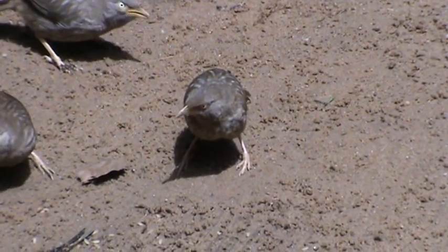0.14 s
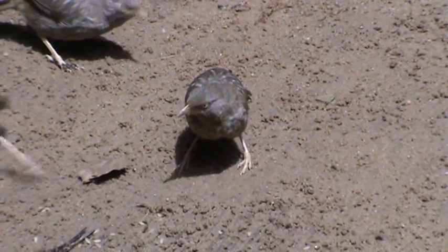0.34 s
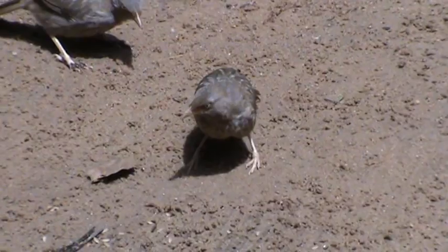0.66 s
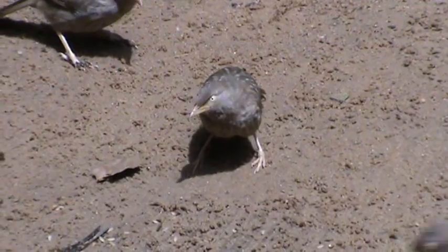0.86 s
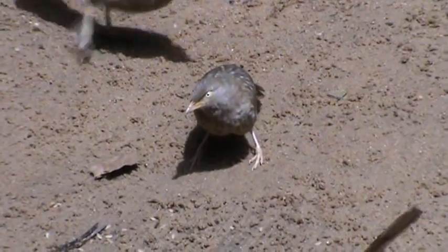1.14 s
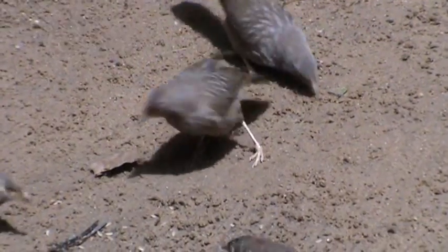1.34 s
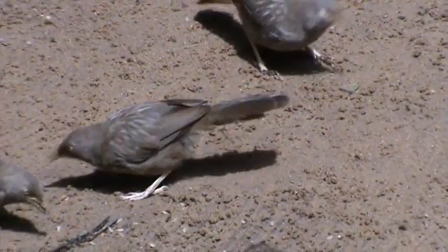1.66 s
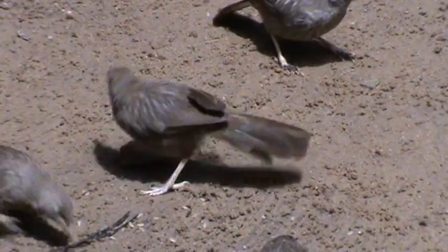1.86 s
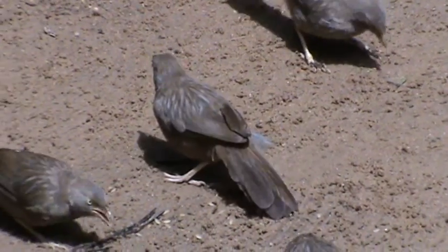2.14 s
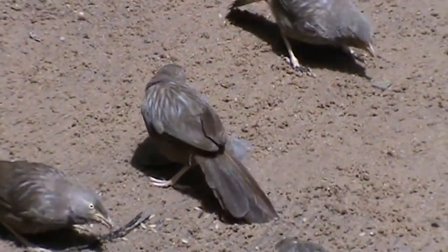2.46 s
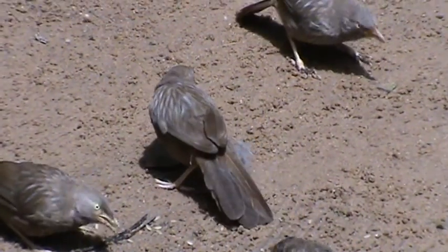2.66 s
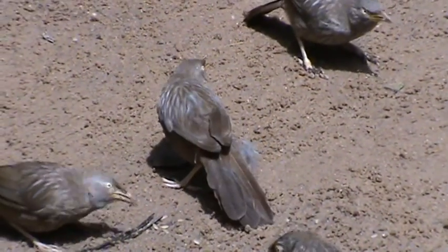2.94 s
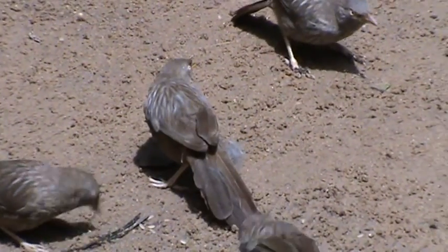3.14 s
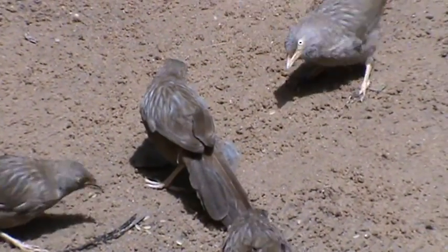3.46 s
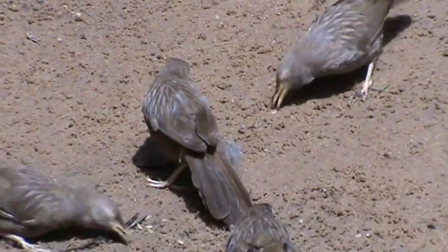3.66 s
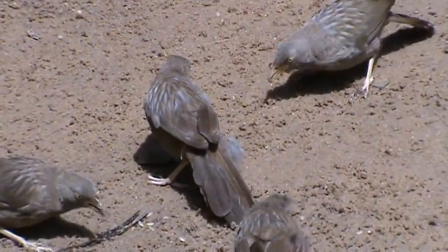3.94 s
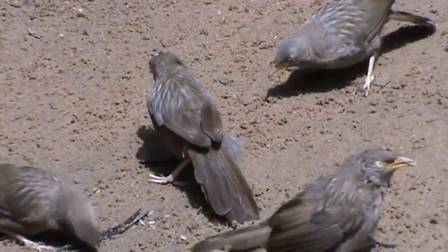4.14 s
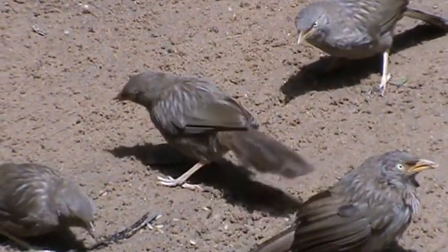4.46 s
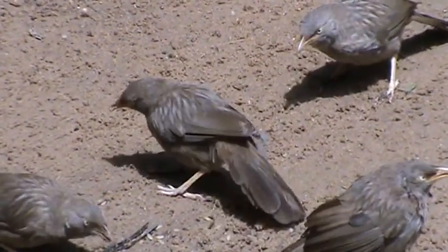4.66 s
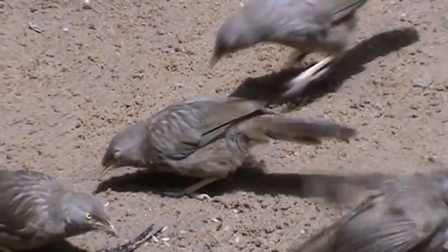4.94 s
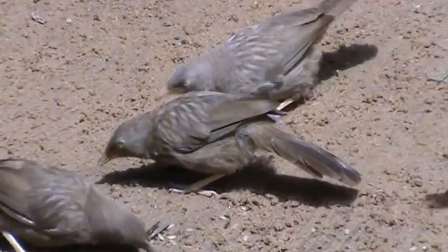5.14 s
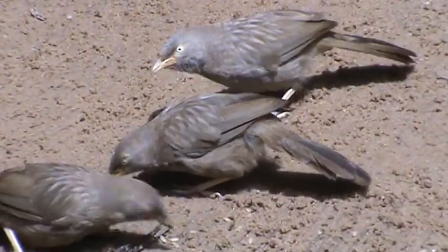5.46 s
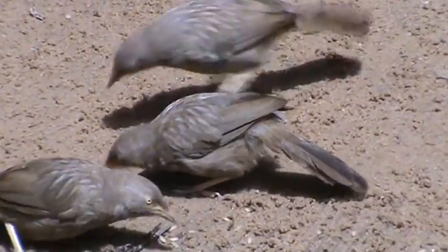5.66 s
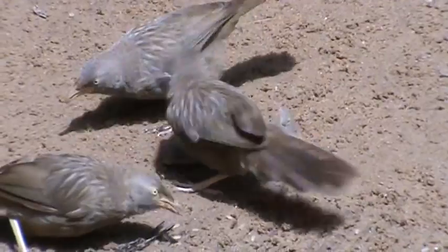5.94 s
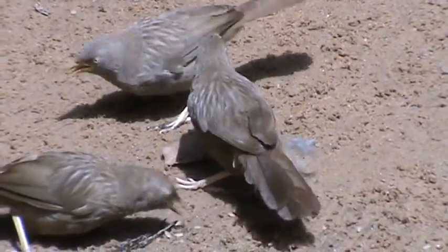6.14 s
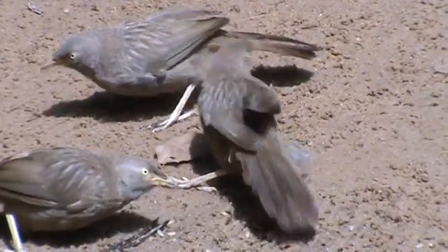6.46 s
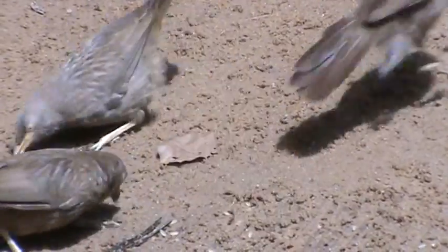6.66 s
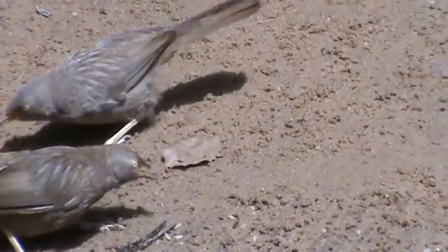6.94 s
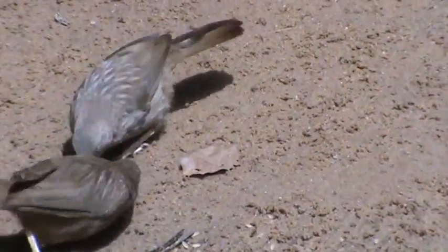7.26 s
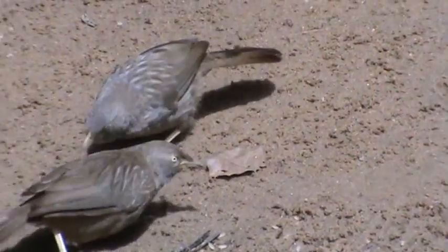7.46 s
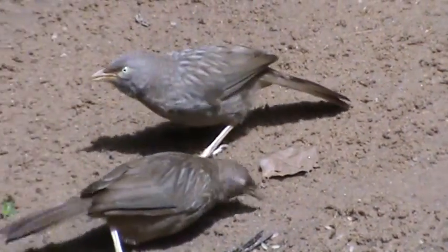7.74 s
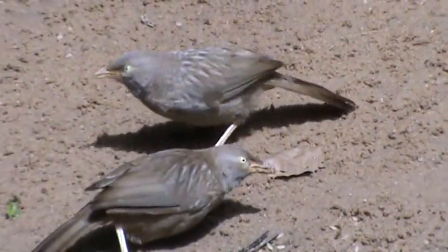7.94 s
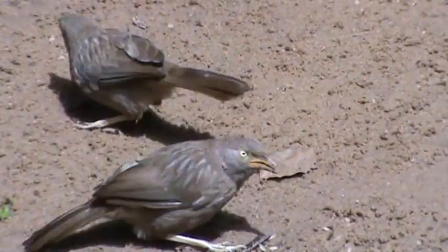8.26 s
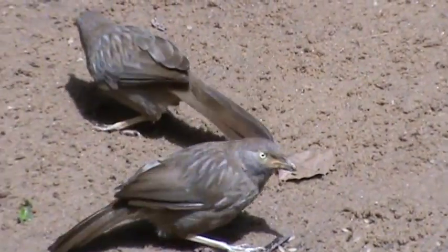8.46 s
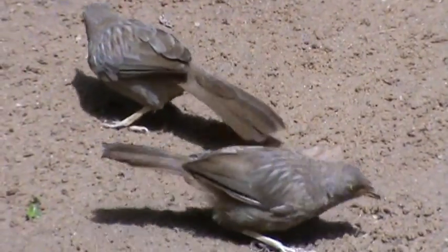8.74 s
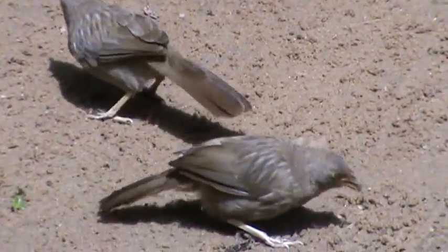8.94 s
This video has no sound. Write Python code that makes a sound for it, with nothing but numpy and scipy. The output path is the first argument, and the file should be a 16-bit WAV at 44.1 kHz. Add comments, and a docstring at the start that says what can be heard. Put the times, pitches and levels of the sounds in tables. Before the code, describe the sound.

Outdoors, a flock of babblers squabbles close to the microphone, with light echoes around them. From 0 to 1.3 seconds calls come thick and fast: rasps, a nasal caw, falling yelps, harsh brays, thin squeaks and clear arching cries. After a short gap, a grunt, peck, caw and more yelps and cries cluster at 1.8-2.7. From 2.9 to 4.6 it is sparser, with faint rising calls, soft wing flutters and gruff grunts slightly left. A sharp yelp at 4.7 starts another quarrel of brays and cries to 5.4; a long trilling squeal at 5.5-5.8 plunges into a rasp. Grunts and a caw follow at 6.2-6.7. From 7.5 a distant songbird on the left repeats a rising whistle and steep downslur four times, amid faint hoarse calls and a peck. A final rasp and weak bray come at 9. A low hum, soft air and a fading far engine run underneath.

```python
"""On open ground a flock of babblers squabbles, with voices mostly around 2 kHz.
Clear cries arch over; split voices add undertones for yelps, brays, caws and grunts; noise makes rasps.
Bursts of noise make fluttering wings and pecking beaks; gliding pure tones make a songbird further off.
Trees and walls echo the birds over a steady low hum, a distant engine and soft outdoor noise."""
import sys
import numpy as np
from scipy import signal
from scipy.fft import rfft, irfft, next_fast_len
from scipy.io import wavfile

SR = 44100
rng = np.random.default_rng(int(sys.argv[2]) if len(sys.argv) > 2 else 0)


def materialize(psi):
    """Save the field psi as 16-bit PCM at rate SR to the path in sys.argv[1].

    A 1-D psi becomes a single channel; in a 2-D psi each row is a channel.
    """
    bounded = np.clip(np.atleast_2d(psi).T, -1, 1)
    quanta = np.round(bounded * 32767).astype(np.int16)
    wavfile.write(sys.argv[1], SR, quanta)


N = 401751
TIME = np.arange(N) / SR
TOP_HZ = 15800  # upper limit of the sound


def undb(db):
    """Turn decibels into gain."""
    return 10 ** (np.asarray(db) / 20)


def unit(x):
    """Scale to an rms level of 1."""
    return x / np.sqrt(np.mean(x ** 2) + 1e-20)


def log_curve(hz, points):
    """Read (Hz, dB) points on a log-frequency axis."""
    point_hz, db = np.transpose(points)
    return np.interp(np.log(hz + 1), np.log(point_hz), db)


def colour(x, db_of):
    """Filter by a gain in dB that depends on frequency."""
    length = x.shape[-1]
    size = next_fast_len(length)
    gain = undb(db_of(np.fft.rfftfreq(size, 1 / SR)))
    return irfft(rfft(x, size) * gain, size)[..., :length]


def wander(size, rate_hz):
    """Smooth random motion around 0 with a spread of about 1, mostly slower than rate_hz."""
    noise = rng.standard_normal(size + SR // 8)
    smooth = colour(noise, lambda f: -20 * np.log10(1 + (f / rate_hz) ** 2))
    return unit(smooth)[:size]


def band_noise(size, hz, slope_db):
    """Noise around a centre; an octave away it is slope_db weaker, two octaves away four times that."""
    noise = rng.standard_normal(size)
    return unit(colour(noise, lambda f: -slope_db * np.log2((f + 1) / hz) ** 2))


def add(out, start, x, pan_db=0):
    """Mix a sound in at its time in seconds; pan_db is how much louder it is on the left."""
    i = max(int(start * SR), 0)
    x = x[:max(N - i, 0)]
    sides = undb(np.array([[pan_db], [-pan_db]]) / 2)
    out[:, i:i + len(x)] += sides * x


def syllable(length, tones_hz, cycles, under_db, rough):
    """The syrinx repeats its pattern every few tone cycles, which puts undertones between the harmonics."""
    size = int(length * SR)
    t = np.arange(size) / SR
    effort = np.sqrt(rough)

    # the pitch follows a smooth curve through its start, middle and end
    hz = np.polyval(np.polyfit([0, .5, 1], tones_hz, 2), t / length)

    # a pattern of more than two cycles also warbles slowly
    warble = .018 * (cycles > 2) * np.sin(2 * np.pi * (22 * t + rng.random()))

    # a strained voice trills, jitters and lurches in pitch; these shares hold at full roughness
    trill = .035 * np.sin(2 * np.pi * 170 * t + wander(size, 50))
    jitter = .045 * wander(size, 402)
    lurch = .022 * wander(size, 73)
    pitch = hz * (1 + warble + rough * (trill + jitter + lurch))
    phase = 2 * np.pi * np.cumsum(pitch) / SR

    voice = np.zeros(size)
    for k in range(1, int(TOP_HZ * cycles / max(tones_hz)) + 1):
        harmonic = k / cycles
        # from the second harmonic to the sixth, each is 5 dB weaker
        db = -5 * np.clip(harmonic - 2, 0, 4)
        if k % cycles:  # an undertone, each of uneven strength
            db = db + under_db + 2 * rng.standard_normal()
        # each partial beats on its own, the higher ones more, and slowly fades in and out
        beating = 1 + .85 * effort * min(harmonic / 2, 2) * wander(size, 840)
        fading_db = 3.6 * effort * wander(size, 35)
        partial = np.sin(harmonic * phase + 2 * np.pi * rng.random())
        voice += undb(db + fading_db) * beating * partial

    # harsh syllables leak air once a pattern
    leak = unit(rng.standard_normal(size) * (1 + np.cos(phase / cycles)))
    shimmer = np.exp(.38 * effort * wander(size, 1100))
    return (unit(voice) + 1.1 * rough * effort * leak) * shimmer


# How the babbler's throat colours its voice. Each row: frequency in Hz, gain in dB.
THROAT = [(300, -28), (650, 2.5), (950, 1.5), (1300, 3), (1700, 7.5), (2350, 6), (2800, 1.5), (4600, 1),
          (5400, 0), (6800, 0), (8500, -6), (15000, -15.5)]


def squawk(length, tones_hz, cycles, db, upper_hz, upper_db, treble_db, under_db, rough,
           fray=0, swell_db=0, low_db=0, width_hz=600, ring_db=0):
    """One syllable; the throat colours it, the opening beak tunes an upper resonance and lets out treble."""
    along = np.linspace(0, 1, int(length * SR))
    # the voice may fray towards the end
    roughness = np.clip(rough + fray * along ** 2, 0, 1)
    source = syllable(length, tones_hz, cycles, under_db, roughness)

    edge_hz = max(upper_hz + 250, 3900)  # the treble change starts here
    beak = [(650, 2 * low_db), (1300, low_db), (2400, 0), (edge_hz, 0), (edge_hz + 700, treble_db)]

    def mouth_db(f):
        upper = upper_db * np.exp(-((f - upper_hz) / width_hz) ** 2)
        # a tight throat rings at one pitch
        ring = ring_db * np.exp(-((f - 2350) / 300) ** 2)
        return log_curve(f, THROAT) + log_curve(f, beak) + upper + ring

    voice = unit(colour(source, mouth_db))
    attack_s, release_s = .02, .036
    gate = np.clip(length * np.minimum(along / attack_s, (1 - along) / release_s), 0, 1)
    # swell_db is the gain in level from start to end
    return voice * gate * undb(db + swell_db * (along - .5))


# Toneless rasps, some of them the hiss of nearby calls, some fainter. Each row: start in seconds,
# length in seconds, level in dB, treble in dB.
RASPS = [(-.02, 0.046, -40.5, -7), (0.301, 0.082, -43.5, -0.5), (0.62, 0.077, -43.5, -1),
         (0.675, 0.13, -39, 1.5), (5.853, 0.11, -37.5, 2), (5.938, 0.15, -43, 0),
         (6.866, 0.21, -48.5, -0.5), (7.257, 0.25, -48, -3), (9.003, 0.1, -40.5, -1)]
# The throat that colours the rasps. Each row: frequency in Hz, gain in dB.
RASP_THROAT = [(400, -19.5), (900, -6.5), (1600, -4), (2200, 2.5), (2900, -5), (4000, -3), (7000, -10.5),
               (15000, -36.5)]


def rasps():
    """Squawks so harsh that only a grainy hiss in the throat is left."""
    out = np.zeros((2, N))
    for start, length, db, treble_db in RASPS:
        size = int(length * SR)
        source = rng.standard_normal(size) * np.exp(.051 * wander(size, 400))
        treble = [(3000, 0), (5500, treble_db)]
        voice = colour(source, lambda f: log_curve(f, RASP_THROAT) + log_curve(f, treble))
        swell = np.sqrt(np.sin(np.pi * np.arange(size) / size))
        add(out, start, undb(db) * unit(voice * swell))
    return out


# The tone balance of the outdoor background. Each row: frequency in Hz, gain in dB.
AIR_COLOUR = [(25, -7.5), (70, -2.5), (140, -9.0), (260, -10.5), (380, -14.5), (900, -15.5), (1400, -19),
              (2200, -17.5), (3500, -24.5), (8000, -28), (15500, -33)]
# The loudness it sways around. Each row: time in seconds, level in dB.
AIR_LEVEL = [(0, -48.5), (9.1, -51)]


def air():
    """Outdoor background noise: bass and faint hiss in the centre, the middle spread wide."""
    mid, side = colour(rng.standard_normal((2, N)), lambda f: log_curve(f, AIR_COLOUR))
    # how far each frequency spreads sideways (Hz, dB)
    spread = [(60, -36), (250, -13.5), (600, -5.5), (6000, -1), (12000, -16.0)]
    side = colour(side, lambda f: log_curve(f, spread))
    both = np.array([mid + side, mid - side])
    sway_db = .7 * wander(N, 0.11)
    return unit(both) * undb(np.interp(TIME, *np.transpose(AIR_LEVEL)) + sway_db)


# Steady low tones. Each row: frequency in Hz, level in dB.
HUM = [(48.4, -51), (199.2, -68.5)]


def hum():
    """Steady pure tones."""
    return sum(undb(db) * np.sqrt(2) * np.sin(2 * np.pi * hz * TIME) for hz, db in HUM)


# How the distant engine runs. Each row: time in seconds, firing rate in Hz, level in dB.
ENGINE = [(0, 72.14, -49), (1.5, 64.23, -53.5), (4, 71.6, -57.5), (5.2, 63.85, -57.5), (9.1, 67.32, -67)]
# Strength of one, two and three times the firing rate, in dB against each other.
ENGINE_ORDERS_DB = [-2, -6, -2.5]


def engine():
    """A far engine sounds at multiples of its firing rate, changes speed and fades."""
    s, hz, db = np.transpose(ENGINE)
    rate = np.interp(TIME, s, hz) * (1 + 0.0121 * wander(N, 8.26))
    phase = 2 * np.pi * np.cumsum(rate) / SR
    drone = np.zeros(N)
    for k, order_db in enumerate(ENGINE_ORDERS_DB, start=1):
        drone += undb(order_db + 1.25 * wander(N, 2.9)) * np.sin(k * phase)
    return unit(drone) * undb(np.interp(TIME, s, db))


# Nasal caws. Each row: start in seconds, length in seconds, pitch in Hz, level in dB,
# upper resonance in Hz, its lift in dB, left minus right in dB.
CAWS = [(0.092, 0.15, 2070, -35.5, 3630, 5.5, -3.5), (1.956, 0.11, 2310, -38.5, 3640, -4.5, 2.5),
        (6.471, .114, 2424, -36.5, 3630, -5, 3.5)]


def caws():
    """The voice drops an octave into a nasal stack that droops."""
    out = np.zeros((2, N))
    for start, length, hz, db, upper_hz, upper_db, pan_db in CAWS:
        tones_hz = (1.07 * hz, hz, .93 * hz)
        voice = squawk(length, tones_hz, 2, db, upper_hz, upper_db, treble_db=-12.5,
                       under_db=1.5, rough=.47, swell_db=5.0, low_db=-7.5)
        add(out, start, voice, pan_db)
    return out


# Falling yelps. Each row: start in seconds, length in seconds, first pitch in Hz, last pitch in Hz,
# tone cycles per pattern, roughness from 0 to 1, level in dB, upper resonance in Hz, its lift in dB,
# treble in dB.
YELPS = [(0.215, 0.094, 2735, 2213, 4, 0.65, -33.5, 3100, 10.5, -0.5),
         (0.391, 0.06, 3480, 2206, 3, 0.48, -33.5, 3240, 9, -10),
         (0.419, 0.062, 3063, 2330, 4, 0.63, -33.5, 3750, 5, -8),
         (2.333, 0.099, 2588, 1890, 3, .32, -36.5, 4470, 13, 3.5),
         (2.407, 0.11, 2720, 1853, 3, 0.5, -37, 4100, 7, 0.5),
         (2.575, 0.097, 2540, 2173, 3, 0.47, -40, 4600, 0, 1),
         (2.642, 0.088, 2696, 2066, 4, 0.69, -40, 4070, 2, -3.5),
         (3.823, 0.14, 3255, 1417, 2, 0.29, -43.5, 4360, 3.5, -6),
         (4.02, 0.12, 2194, 1920, 3, 0.48, -42.5, 3760, -1, -2),
         (4.678, 0.055, 3506, 2680, 2, 0.48, -30.5, 4960, 5, -8),
         (4.728, 0.065, 2905, 2040, 2, .5, -41, 3580, 7, -8),
         (5.132, 0.084, 2480, 1696, 3, 0.28, -36, 3520, 7, -3.5)]


def yelps():
    """A split voice slides down through a ringing throat."""
    out = np.zeros((2, N))
    for start, length, first, last, cycles, rough, db, upper_hz, upper_db, treble_db in YELPS:
        tones_hz = (first, (first + last) / 2, last)
        voice = squawk(length, tones_hz, cycles, db, upper_hz, upper_db, treble_db,
                       under_db=-3, rough=rough, swell_db=4.0, low_db=-3.5, ring_db=4.0)
        add(out, start, voice, pan_db=-1.5)
    return out


# Harsh held brays. Each row: start in seconds, length in seconds, pitch in Hz, tone cycles per pattern,
# roughness from 0 to 1, level in dB, upper resonance in Hz, its lift in dB, treble in dB.
BRAYS = [(0.461, 0.14, 1925, 3, 0.22, -36, 3720, 6.5, -7),
         (0.779, 0.2, 1892, 3, 0.26, -34.5, 3770, 3.5, -10),
         (2.044, 0.11, 2030, 3, 0.23, -41, 4750, -4, 0.5), (4.773, 0.13, 2486, 2, 0.72, -36, 4300, 4, -7),
         (5.193, 0.129, 1955, 3, 0.38, -35, 3400, 4, -2.5), (9.008, .12, 1850, 3, .3, -46, 3860, 19, 2)]


def brays():
    """A split voice settles onto its pitch and holds, with strong undertones and hiss from the open beak."""
    out = np.zeros((2, N))
    for start, length, hz, cycles, rough, db, upper_hz, upper_db, treble_db in BRAYS:
        tones_hz = (1.06 * hz, hz, 1.01 * hz)
        voice = squawk(length, tones_hz, cycles, db, upper_hz, upper_db, treble_db,
                       under_db=0, rough=rough, swell_db=2.0, low_db=-12)
        size = len(voice)
        # a hiss, and a fainter sizzle far above it; both follow the treble setting
        hiss = undb(-4.5) * band_noise(size, 5100, slope_db=93)
        sizzle = undb(-19.5) * band_noise(size, 12200, slope_db=40)
        swell = np.sin(np.linspace(0, np.pi, size))
        add(out, start, voice + undb(db + treble_db) * (hiss + sizzle) * swell, pan_db=-1.0)
    return out


# Clear cries. Each row: start in seconds, length in seconds, top pitch in Hz, share of the length at
# which it is reached, share of pitch lost by the end, level in dB, lift of the upper resonance in dB,
# treble in dB, roughness from 0 to 1 at the start.
CRIES = [(0.575, 0.069, 1930, 0.23, 0.084, -33, 14, 0, 0.6),
         (0.942, 0.12, 2242, 0.31, 0.21, -32, 4, -3, 0.24),
         (1.128, 0.086, 2277, 0.48, 0.078, -30.5, 3, -13, 0),
         (1.201, 0.12, 2150, 0.16, 0.35, -36, 6.5, -3, 0.02),
         (2.117, 0.14, 2043, 0.213, 0.38, -38, 4, 5.5, 0.58),
         (4.875, 0.15, 1992, 0.37, 0.38, -36.5, 13, 2.5, 0.33),
         (5.295, 0.13, 2090, 0.25, 0.39, -35, 10, -2.5, 0.38)]


def cries():
    """A clear tone arches over, its upper resonance near the second harmonic; it frays as the effort fades."""
    out = np.zeros((2, N))
    for start, length, hz, top, fall, db, upper_db, treble_db, rough in CRIES:
        arch = ((np.array([0, .5, 1]) - top) / (1 - top)) ** 2
        tones_hz = hz * (1 - fall * arch)
        voice = squawk(length, tones_hz, 2, db, 1.82 * hz, upper_db, treble_db,
                       under_db=-31, rough=rough, fray=0.44, swell_db=-2.5, width_hz=1250)
        add(out, start, voice, pan_db=-0.5)
    return out


# Thin squeaks over the rasping voice. Each row: start in seconds, length in seconds, pitch in Hz,
# level in dB.
SQUEAKS = [(0.672, 0.079, 4690, -38), (0.674, 0.055, 5230, -35), (2.045, 0.097, 4760, -47.5),
           (6.179, 0.088, 5020, -53)]


def squeaks():
    """A high, almost pure tone, slightly arched, with no undertones."""
    out = np.zeros((2, N))
    for start, length, hz, db in SQUEAKS:
        tones_hz = (.96 * hz, hz, .96 * hz)
        voice = squawk(length, tones_hz, 1, db, upper_hz=hz, upper_db=4, treble_db=-4.0,
                       under_db=0, rough=0.28, swell_db=3)
        add(out, start, voice)
    return out


# Gruff grunts. Each row: start in seconds, length in seconds, pitch in Hz, share of pitch lost,
# tone cycles per pattern, roughness from 0 to 1, level in dB, lift of the upper resonance in dB,
# treble in dB.
GRUNTS = [(1.76, 0.16, 2355, 0.06, 6, 0.63, -43.5, 5.5, -8),
          (3.597, 0.15, 2408, 0.13, 5, 0.66, -43.5, 1.5, -1),
          (4.109, 0.081, 2344, 0.0082, 4, 0.15, -38.5, 10.5, -4),
          (4.286, 0.12, 2284, 0.048, 4, 0.5, -43, 4.5, -8.5),
          (4.487, 0.13, 2223, 0.15, 5, 0.66, -42, 3, -8),
          (6.246, 0.1244, 2310, 0.1236, 5, 0.62, -41, 3.5, -10.5),
          (6.341, 0.091, 2687, 0.075, 6, 0.65, -36.5, 6, -10.5),
          (6.642, 0.099, 2368, 0.16, 5, 0.66, -38.5, 8.5, -5.5)]


def grunts():
    """Long patterns crowd the undertones into a gruff buzz that sags a little, from a bird to the left."""
    out = np.zeros((2, N))
    for start, length, hz, sag, cycles, rough, db, upper_db, treble_db in GRUNTS:
        tones_hz = hz * (1 + sag * np.array([.5, 0, -.5]))
        voice = squawk(length, tones_hz, cycles, db, 3430, upper_db, treble_db, under_db=-5.5,
                       rough=rough, swell_db=4.5, low_db=-0.5, width_hz=370, ring_db=2.0)
        add(out, start, voice, pan_db=3.0)
    return out


# Pecks. Each row: time in seconds, level in dB, ring in Hz.
PECKS = [(1.942, -46, 5560), (5.207, -43, 11500), (7.12, -49, 4340), (8.672, -48, 6010)]


def pecks():
    """Beaks tick on the ground: band noise that dies away within milliseconds."""
    out = np.zeros((2, N))
    t = np.arange(SR // 20) / SR
    for start, db, hz in PECKS:
        add(out, start, undb(db) * np.exp(-t / 0.0039) * band_noise(len(t), hz, slope_db=18))
    return out


# Hoarse rising calls from birds further off. Each row: start in seconds, length in seconds,
# first pitch in Hz, last pitch in Hz, level in dB.
FAR_CALLS = [(2.91, 0.16, 2050, 2180, -62), (3.511, .17, 2000, 2510, -47), (7.299, 0.2, 2125, 2340, -50),
             (7.819, 0.16, 2010, 2165, -46)]


def far_calls():
    """A hoarse voice rises; at a distance little but its main tone is left."""
    out = np.zeros((2, N))
    for start, length, first, last, db in FAR_CALLS:
        middle = (first + last) / 2
        voice = squawk(length, (first, middle, last), 6, db, upper_hz=middle, upper_db=9,
                       treble_db=-5, under_db=-3, rough=.7, swell_db=4, width_hz=450)
        add(out, start, voice)
    return out


# Wing flutters. Each row: start in seconds, length in seconds, level in dB, brightest frequency in Hz.
FLUTTERS = [(3.17, 0.11, -58, 3430), (3.431, 0.084, -46.5, 1750), (3.631, 0.061, -54, 4960),
            (4.691, 0.07, -42, 1300), (5.879, 0.12, -50.5, 893), (8.522, 0.026, -52.5, 10000),
            (8.944, 0.063, -47.5, 534)]


def flutters():
    """Feathers swish in quick strokes: noise that starts each stroke strong and weakens through it."""
    strokes_per_s = 42
    out = np.zeros((2, N))
    for start, length, db, hz in FLUTTERS:
        t = np.arange(int(length * SR)) / SR
        strokes = np.exp(-0.57 * (t * strokes_per_s % 1))
        swish = strokes * np.sqrt(np.sin(np.pi * t / length))
        add(out, start, undb(db) * unit(swish * band_noise(len(t), hz, slope_db=3.5)))
    return out


# The long squeal. Each row: time in seconds, pitch in Hz, level in dB, trill depth as a share of the pitch.
SQUEAL = [(5.521, 1997, -65, 0.017), (5.533, 1945, -36.5, 0.016), (5.571, 1950, -32, 0.04),
          (5.63, 1828, -35, 0.033), (5.657, 2002, -28, 0.026), (5.72, 1911, -30.5, 0.041),
          (5.764, 1740, -31.5, 0.068), (5.802, 1544, -32.5, 0.055), (5.831, 1253, -37.5, 0.19)]
# Its harmonics from the first up, before the throat colours them, in dB against each other.
SQUEAL_HARMONICS_DB = [-7, 3.5, -9.5, -10.5, -18, -12, -31]


def squeal():
    """One long cry led by its second harmonic; a fast uneven trill deepens as the pitch plunges."""
    s, hz, db, depth = np.transpose(SQUEAL)
    t = np.arange(s[0], s[-1], 1 / SR)
    # 235 swings a second split each harmonic
    trill = np.sin(2 * np.pi * 235 * t + wander(len(t), 40)) + .22 * wander(len(t), 120)
    pitch = np.interp(t, s, hz) * (1 + np.interp(t, s, depth) * trill)
    phase = 2 * np.pi * np.cumsum(pitch) / SR
    source = np.zeros(len(t))
    for k, harmonic_db in enumerate(SQUEAL_HARMONICS_DB, start=1):
        source += undb(harmonic_db + 2.5 * wander(len(t), 130)) * np.sin(k * phase)
    voice = unit(colour(source, lambda f: log_curve(f, THROAT)))
    out = np.zeros((2, N))
    add(out, s[0], voice * undb(np.interp(t, s, db)), pan_db=-3)
    return out


def whistle(shape):
    """A pure gliding note whose pitch trembles slightly."""
    s, hz, db = np.transpose(shape)
    t = np.arange(s[0], s[-1], 1 / SR)
    pitch = np.interp(t, s, hz) * (1 + 0.0076 * wander(len(t), 90))
    tone = np.sqrt(2) * np.sin(2 * np.pi * np.cumsum(pitch) / SR)
    return tone * undb(np.interp(t, s, db))


# The softer note that opens the song. Each row: time in seconds, pitch in Hz, level in dB before distance.
OPENING_NOTE = [(7.459, 2575, -65), (7.485, 2690, -48), (7.53, 2720, -73)]
# The time of each phrase, in seconds.
PHRASES_S = [7.566, 7.996, 8.381, 8.798]
# The rising whistle. Each row: seconds from the phrase time, pitch in Hz, level in dB within the note.
WHISTLE = [(-.07, 2369, -4), (-.045, 2120, -8), (-.008, 2400, -6), (.008, 3014, 8.5), (0.025, 3060, -0.5),
           (.06, 3013, -22)]
# The steep downslur. Each row: seconds from its own start, pitch in Hz, level in dB within the note.
DOWNSLUR = [(0, 5200, -6), (.012, 5570, -8.5), (.03, 5220, -9.5), (.05, 4507, -2), (.07, 3700, 4),
            (.088, 3360, -3.5), (.105, 3080, -27)]


def songbird():
    """A rising whistle answered by a steep downslur, again and again, off to the left."""
    pan_db = 3
    slur_after_s = .114
    whistle_db, slur_db = -48, -42  # before distance
    out = np.zeros((2, N))
    add(out, OPENING_NOTE[0][0], whistle(OPENING_NOTE), pan_db)
    for start in PHRASES_S:
        add(out, start + WHISTLE[0][0], whistle(WHISTLE) * undb(whistle_db), pan_db)
        add(out, start + slur_after_s, whistle(DOWNSLUR) * undb(slur_db), pan_db)
    return out


def echoes(x, t60, wet_db, early_db, early_s, treble_db):
    """Sparse early reflections, then a diffuse tail that falls 60 dB in t60 seconds."""
    t = np.arange(SR) / SR
    tail = rng.standard_normal((2, SR)) * undb(-60 * t / t60) * (1 - np.exp(-t / 0.022))
    # only 3 in 100 moments carry an early reflection
    sparse = rng.random((2, SR)) < .03
    early = rng.standard_normal((2, SR)) * sparse * np.exp(-t / early_s)
    paths = (undb(wet_db) * unit(tail) + undb(early_db) * unit(early)) / np.sqrt(SR)
    response = colour(paths, lambda f: log_curve(f, [(4000, 1.0), (12000, treble_db)]))
    return signal.fftconvolve(x, response, axes=1)[:, :N]


def scene():
    """The flock is near; the songbird is heard mostly through its echoes."""
    calls = rasps() + caws() + yelps() + brays() + cries() + squeaks() + grunts() + far_calls() + squeal()
    flock = calls + pecks() + flutters()
    flock = flock + echoes(flock, t60=.8, wet_db=-7.5, early_db=-4, early_s=.012, treble_db=0)
    song = songbird()
    song_echoes = echoes(song, t60=1.0, wet_db=-3.5, early_db=2.5, early_s=0.097, treble_db=7)
    far = undb(-8.0) * song + song_echoes
    return flock + far + hum() + engine() + air()


def record(dry):
    """A steep low-pass filter cuts the sound above TOP_HZ."""
    return signal.sosfilt(signal.ellip(10, .2, 80, TOP_HZ, fs=SR, output="sos"), dry)


dry = scene()
out = record(dry)
materialize(out)
```